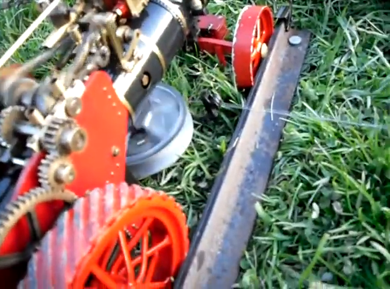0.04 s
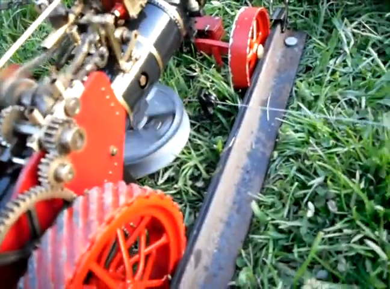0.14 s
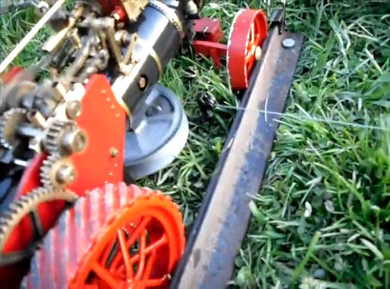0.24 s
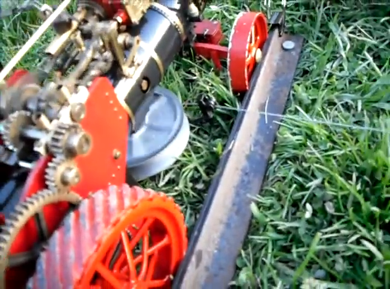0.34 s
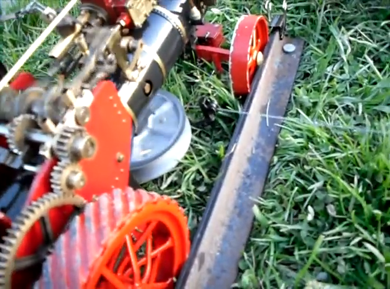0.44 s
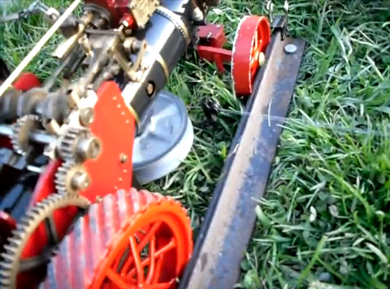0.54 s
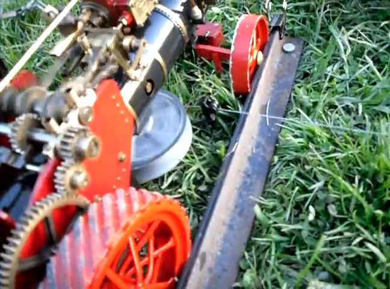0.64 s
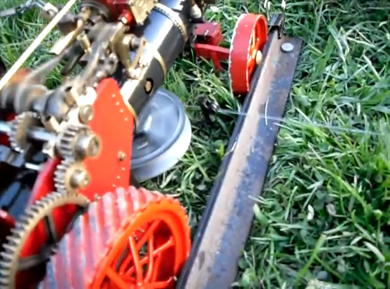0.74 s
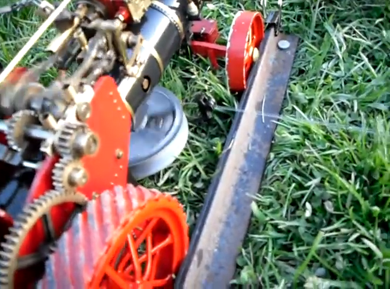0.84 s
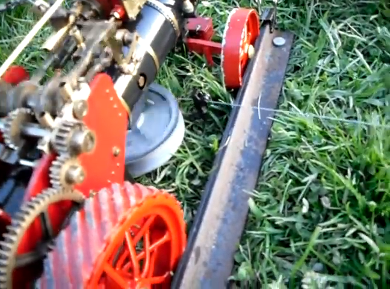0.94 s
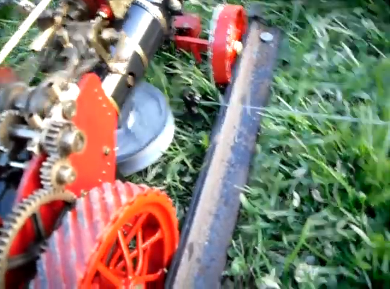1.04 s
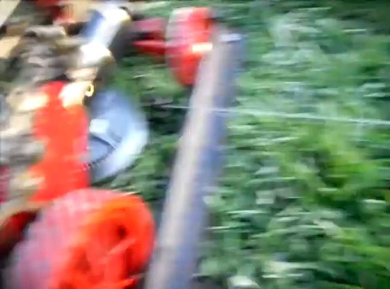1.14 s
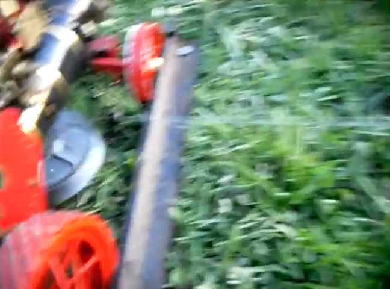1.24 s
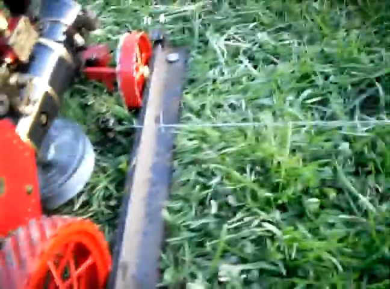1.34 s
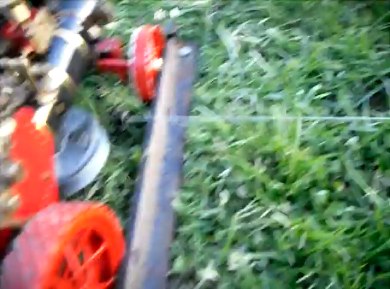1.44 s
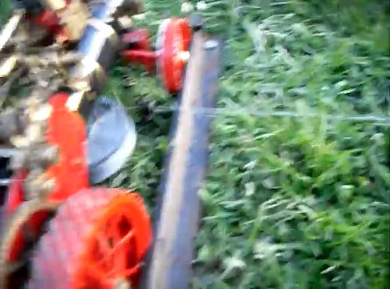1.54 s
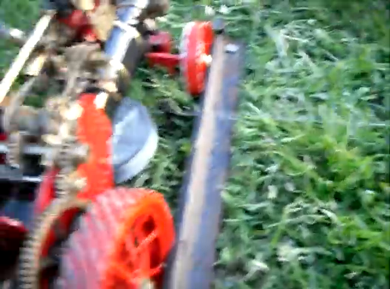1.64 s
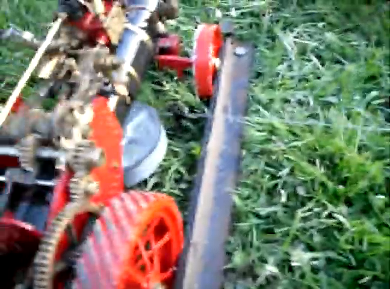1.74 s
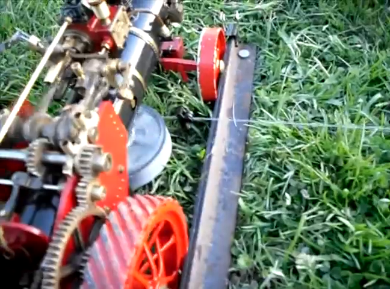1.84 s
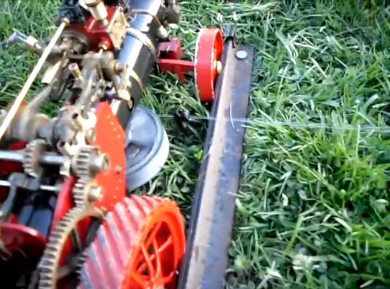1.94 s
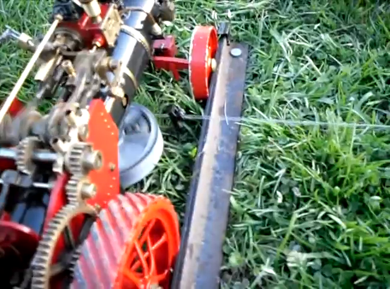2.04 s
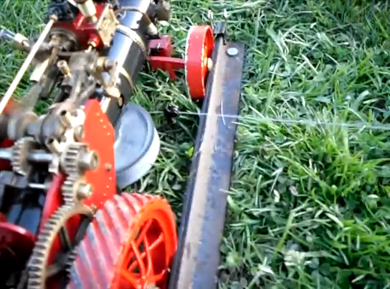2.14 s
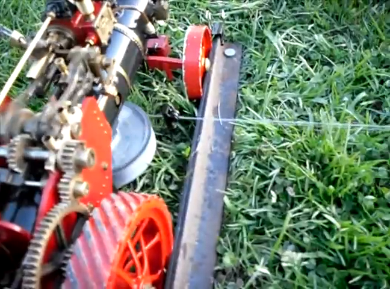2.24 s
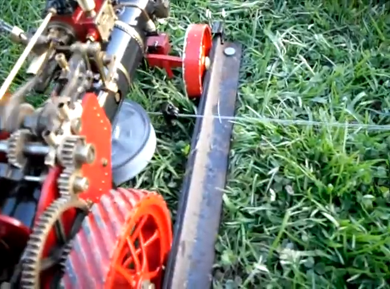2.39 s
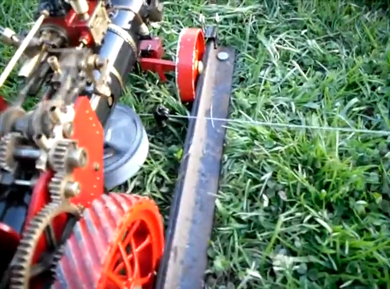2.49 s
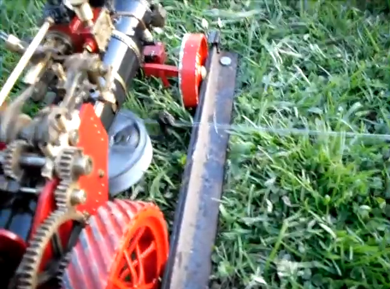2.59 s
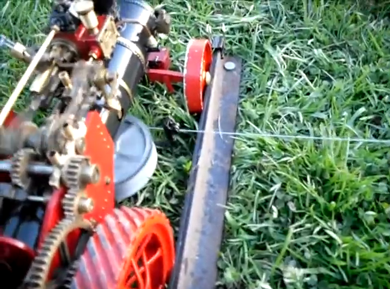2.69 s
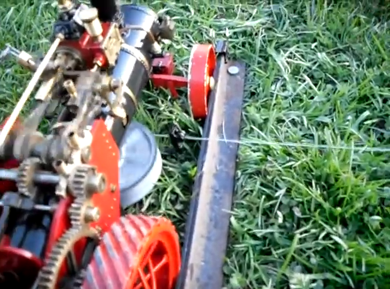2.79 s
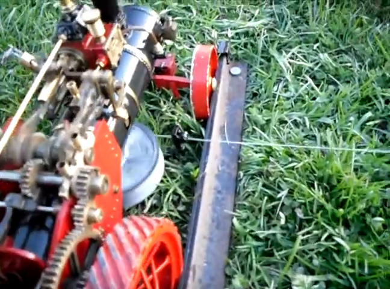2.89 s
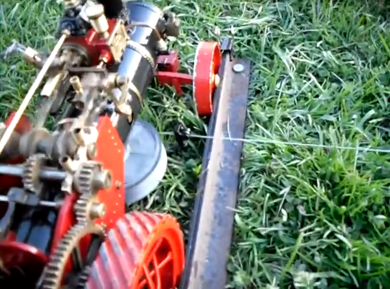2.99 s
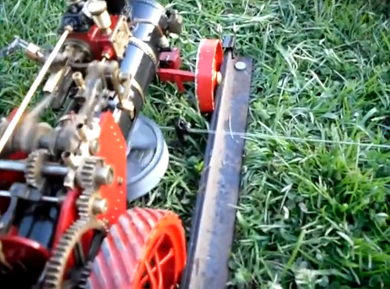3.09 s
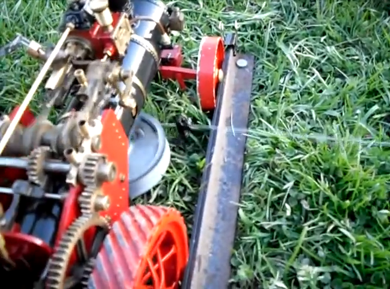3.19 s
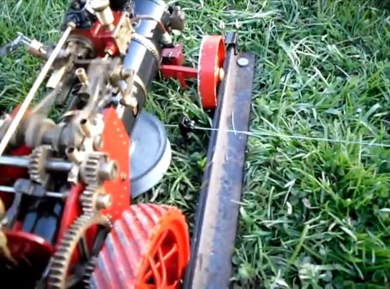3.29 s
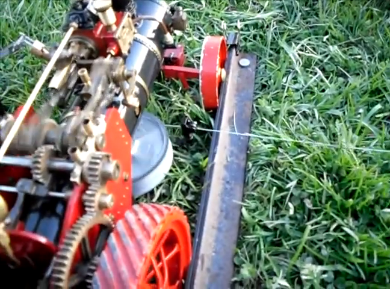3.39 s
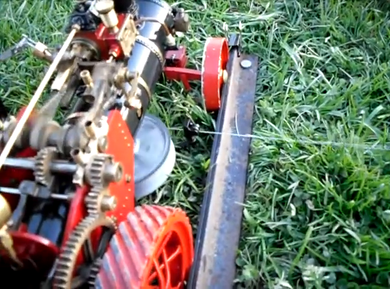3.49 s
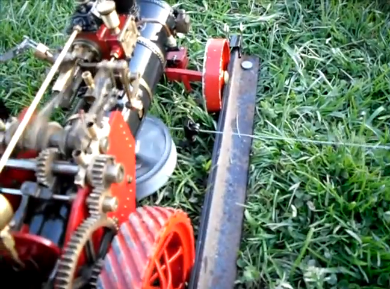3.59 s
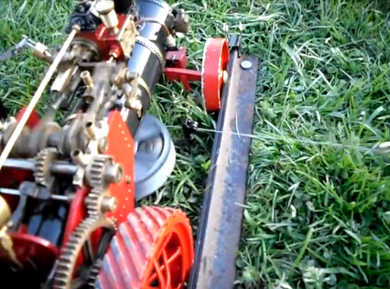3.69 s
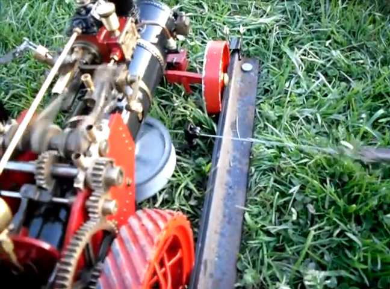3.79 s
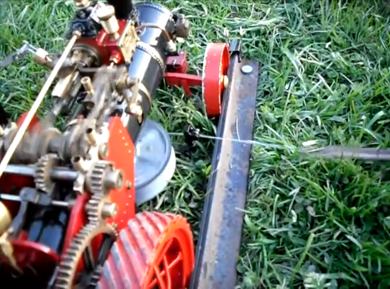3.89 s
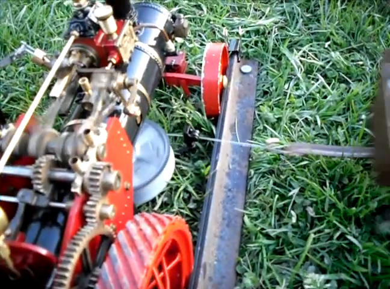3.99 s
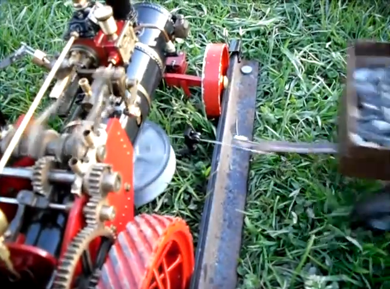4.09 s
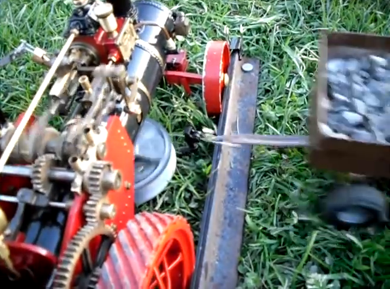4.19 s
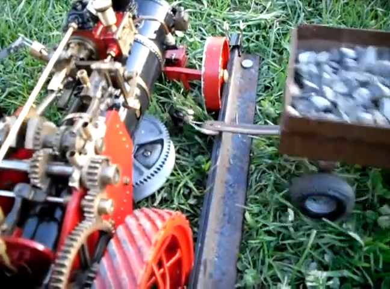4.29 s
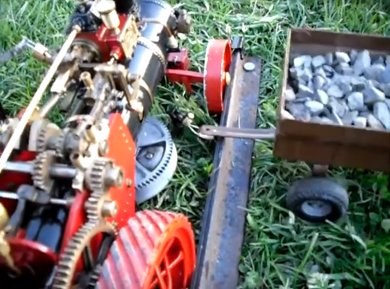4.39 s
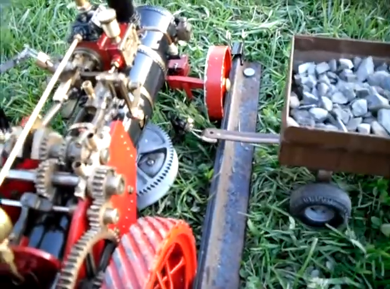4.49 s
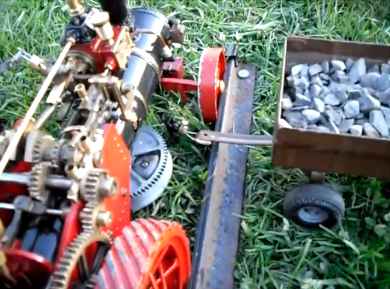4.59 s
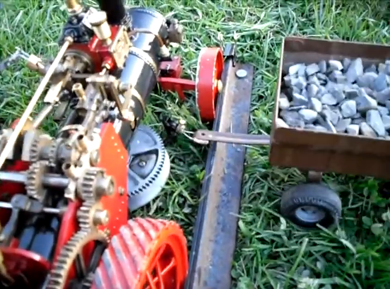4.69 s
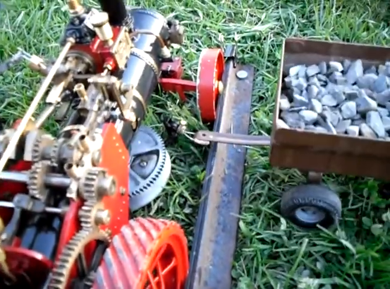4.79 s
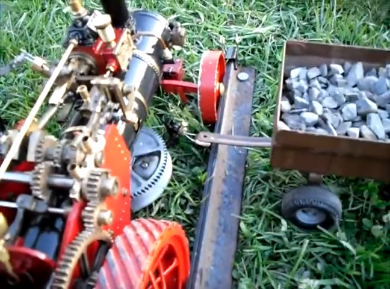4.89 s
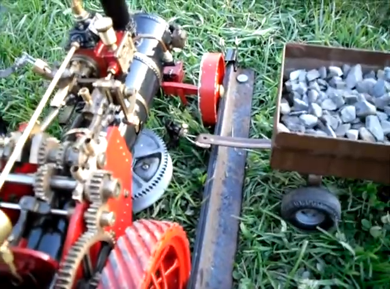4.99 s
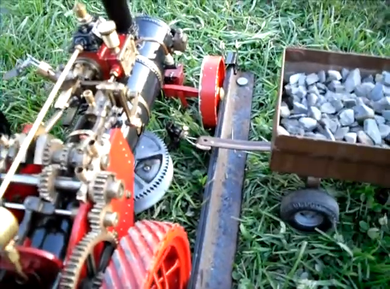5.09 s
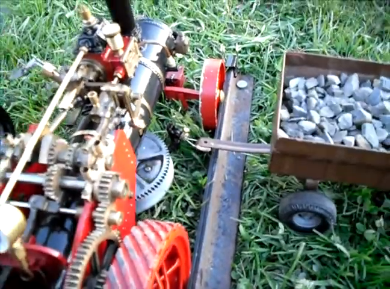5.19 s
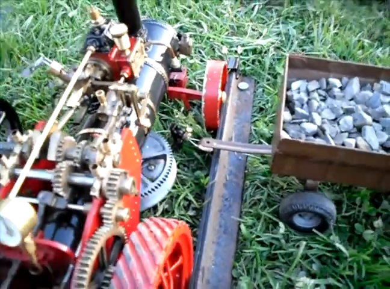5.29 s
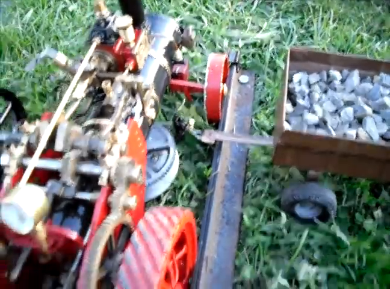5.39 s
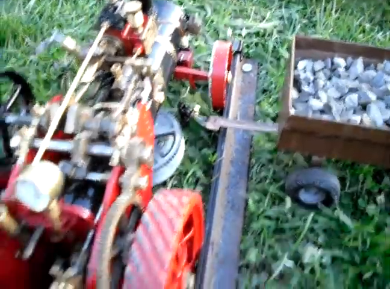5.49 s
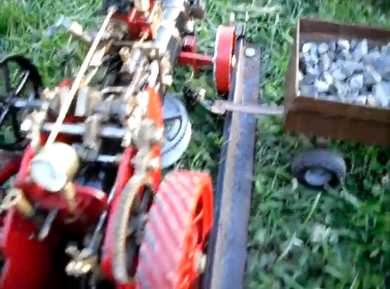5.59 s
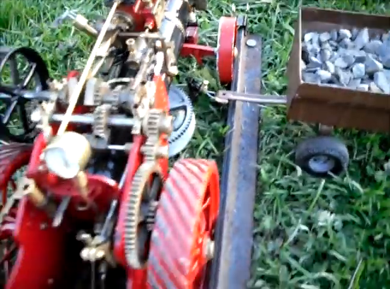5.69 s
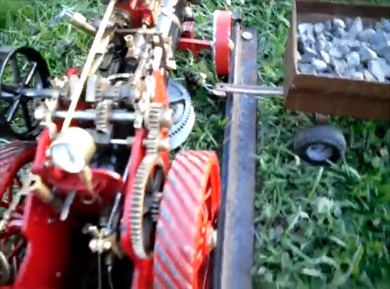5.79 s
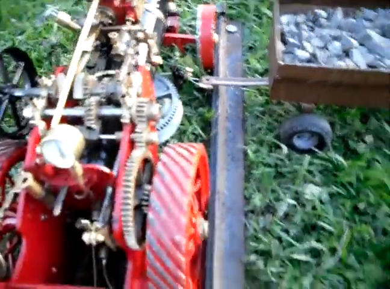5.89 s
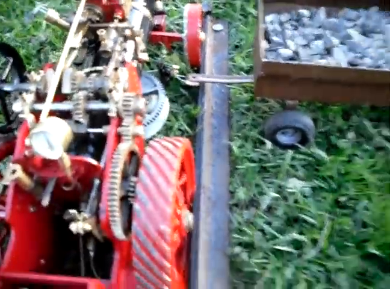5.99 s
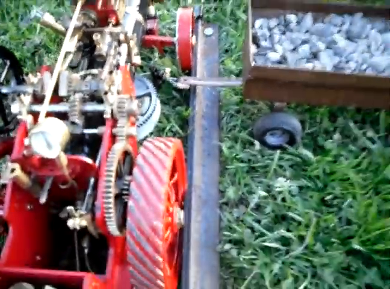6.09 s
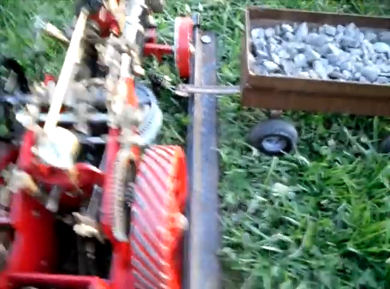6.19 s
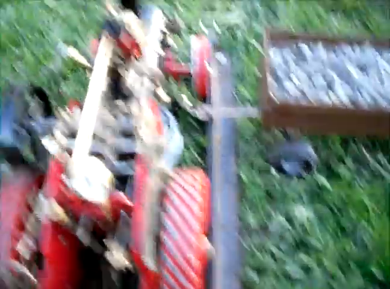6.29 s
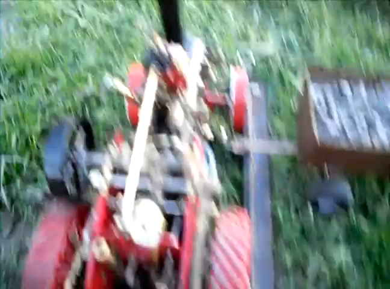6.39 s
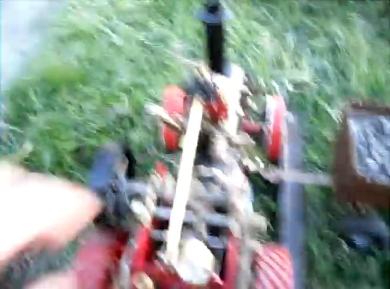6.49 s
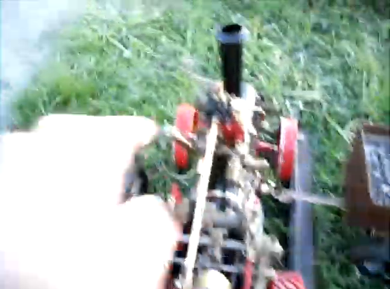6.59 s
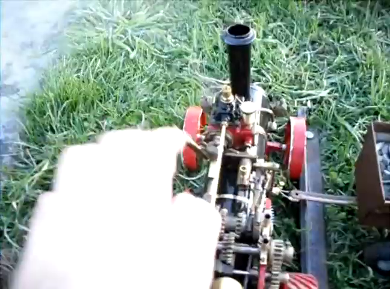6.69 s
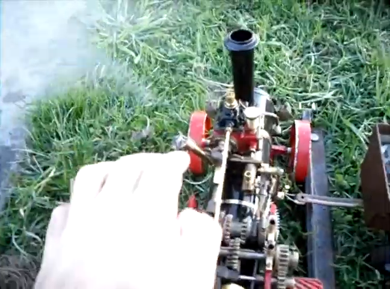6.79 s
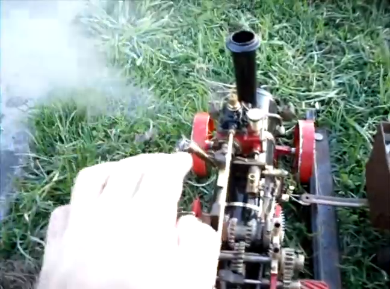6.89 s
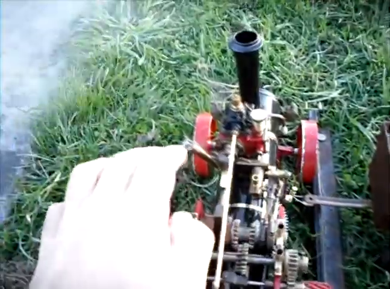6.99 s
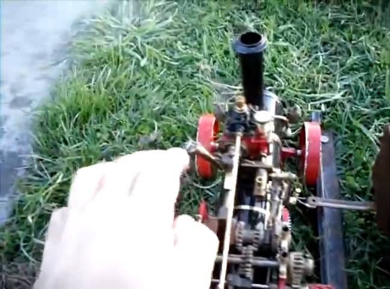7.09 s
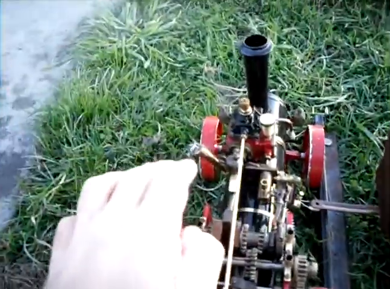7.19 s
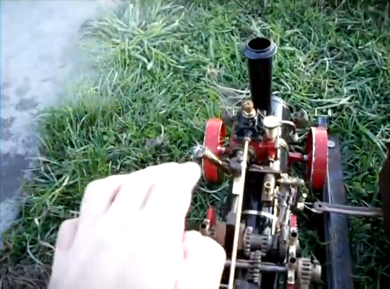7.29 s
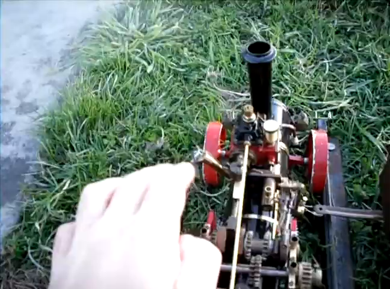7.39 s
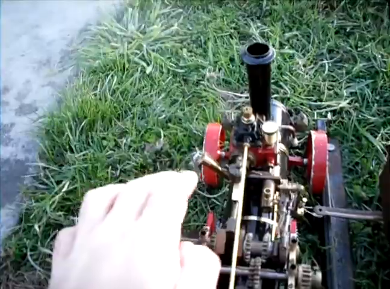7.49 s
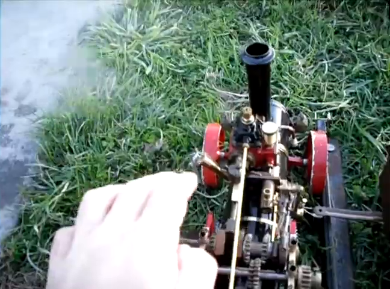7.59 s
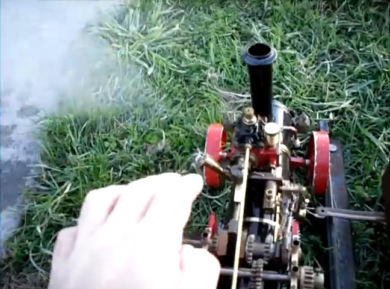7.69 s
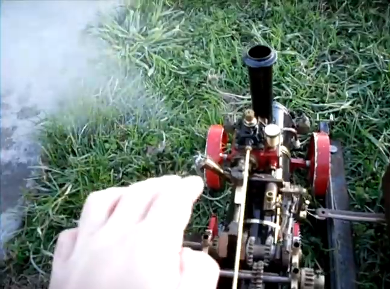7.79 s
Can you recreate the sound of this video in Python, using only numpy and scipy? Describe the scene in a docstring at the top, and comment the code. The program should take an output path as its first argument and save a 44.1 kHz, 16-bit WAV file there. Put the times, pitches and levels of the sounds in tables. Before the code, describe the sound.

A small model steam engine chuffs and clatters rapidly, stops and hisses faintly, then gives three shrill, breathy whistle blasts.

```python
"""Model traction engine on a lawn

A model steam traction engine runs in the open air, close to the microphone of a small hand-held camera.
Each turn of the crank gives a puff up the chimney and two bursts of clatter; then it stops and simmers,
ticking. Its whistle is pulled three times, breathy at first, then shrill enough to overload the camera."""
import sys
import numpy as np
from scipy import signal
from scipy.fft import irfft
from scipy.io import wavfile

SR = 44100
rng = np.random.default_rng(int(sys.argv[2]) if len(sys.argv) > 2 else 0)


def inscribe(sig):
    """Save sig as 16-bit PCM at rate SR to the path in sys.argv[1].

    A 1-D sig is mono; a 2-D sig holds one channel per row.
    Samples are clipped to [-1, 1] before scaling.
    """
    pcm = np.round(np.clip(np.atleast_2d(sig).T, -1, 1) * 32767)
    wavfile.write(sys.argv[1], SR, pcm.astype(np.int16))


N = 346185
TIME = np.arange(N) / SR

# The boiler's simmer over the garden air. Each row: frequency in Hz, relative level in dB.
SIMMER_COLOUR = [(20, -0.5), (100, 0.5), (170, 3), (260, -1), (500, -5), (660, -10), (900, -12.5),
                 (1400, -14), (3100, -17), (3600, -10), (3800, -10), (4300, -10.5), (4800, -9.5),
                 (5300, -10.5)]
# Faint whines of steam in the passages. Each row: frequency in Hz, width in Hz, level before the fade
# in dB, share of the fade from 0 to 1.
WHINES = [(647, 110, -58, 0.97), (2000, 80, -66.5, 0.97), (3530, 110, -66.5, 0.02)]
# The whines ebb once the engine stands. Each row: time in seconds, gain in dB.
WHINE_FADE = [(0, 1.5), (4.2, -1.5), (4.7, 0.5), (5.3, -11.5), (7.85, -6.5)]
# Handling at the microphone. Each row: start in seconds, length in seconds, frequency in Hz, level in dB.
BUMPS = [(.34, 0.14, 156.3, -44), (2.08, 0.11, 149.5, -49.5), (5.443, 0.078, 59, -47.5),
         (5.684, 0.13, 129.4, -49.5), (5.94, 0.11, 48.6, -46), (6.015, 0.16, 64.5, -54),
         (7.254, 0.031, 108, -39), (7.276, 0.062, 108, -40)]
# Ticks of hot metal and spitting water. Each row: start in seconds, relative peak in dB.
TICKS = [(4.078, -26), (4.124, -27.5), (4.1659, -29.5), (4.4698, -30), (4.9267, -34), (5.0515, -39.5),
         (5.4167, -25), (5.813, -34), (5.951, -29.5), (6.3846, -37)]
# The spectrum of a tick. Each row: frequency in Hz, relative level in dB.
TICK_COLOUR = [(200, -8.5), (700, -13.5), (1100, -16), (2500, -16), (3300, -9), (4300, 0.5), (4700, -7),
               (5500, -16.5)]
# The drawbar and wagon coming to rest. Each row: start in seconds, peak in dB.
RATTLES = [(4.580, -32), (4.591, -30.5), (4.617, -28), (4.632, -29), (4.645, -34), (4.765, -47),
           (5.813, -35), (6.112, -39)]
# The drawbar's resonances. Each row: frequency in Hz, width in Hz, relative level in dB.
DRAWBAR_MODES = [(640, 72, 1.5), (1610, 190, -4.5), (2570, 130, 2), (3750, 64, 2.5), (4300, 960, -9.5)]
# Knocks through the chassis. Each row: start in seconds, peak in dB.
KNOCKS = [(.9870, -2.0), (1.0174, -15)]
# The chassis's resonances. Each row: frequency in Hz, width in Hz, relative level in dB.
CHASSIS_MODES = [(653, 54, 6.5), (1390, 330, -11), (1660, 350, -10), (2554, 184, 0), (4320, 240, -5),
                 (5070, 150, -24)]
# The crank, about 11 turns a second at first, then 14. Each row: time in seconds, turns done.
CRANK_TURNS = [(.02, 0), (.11, 1), (.208, 2), (.556, 6), (.797, 9), (1.105, 13), (1.315, 16), (1.979, 25),
               (3.385, 45), (3.607, 48), (3.884, 52), (4.043, 54), (4.142, 55)]
# How hard the engine works. Each row: time in seconds, relative level in dB.
EFFORT = [(0, -37), (.8, -37.5), (1.1, -36.5), (1.6, -37.5), (2.2, -37), (3.0, -37.5), (3.85, -37.5),
          (4.05, -38.5), (4.14, -46), (4.2, -45.5), (4.35, -57)]
# Slack taken up in rods and valve gear. Each row: share of a turn, relative level in dB,
# decay in seconds, stroke (0 outward, 1 return).
CLACKS = [(.338, -17, 0.0012, 0), (.388, -2.5, 0.003, 0), (.419, 3, 0.0028, 0), (.478, -2, 0.00064, 0),
          (.581, 2, 0.0029, 1), (.621, -3, 0.0043, 1), (.657, -5, 0.0064, 1), (.912, -9, 0.0057, 1)]
# Resonances of the motion work. Each row: frequency in Hz, width in Hz, then relative levels in dB
# for the outward stroke, the return stroke and sliding.
FRAME_MODES = [(699, 162, -2.5, -2, 2.5), (1615, 164, -15, 1, -1.5), (1735, 66, -2.5, 6.5, -20.5),
               (2085, 73, -5.5, -20.5, 3.5), (2426, 280, 0.5, 0.5, 0), (2850, 760, -27, -4, -6),
               (3613, 100, 3.5, -3, -20.5), (4090, 380, 2, 5.5, 2), (4800, 940, -2, 1, -20.5),
               (5080, 550, -4.5, 2.5, -4.5)]
# Friction and steam flow, with a lull just before the puff. Each row: share of a turn, gain in dB.
SLIDING = [(0, -1), (.1, 2.5), (.33, 2.5), (.55, -2.5), (.8, -3), (.94, 1.5), (.98, -0.5), (1, -3)]
# Drops of water spat through the whistle. Each row: start in seconds, peak in dB.
SPITS = [(6.719, -10), (7.534, 2.5), (7.719, 3)]
# The spectrum of a spit. Each row: frequency in Hz, relative level in dB.
SPIT_COLOUR = [(100, -9), (1500, -9.5), (3400, -5.5), (4300, -0.5), (5300, 3.5)]
# The whistle's steam jet. Each row: frequency in Hz, relative level in dB.
JET_COLOUR = [(30, -20), (200, -17), (500, -18.5), (2000, -17.5), (2600, -15.5), (3050, -6), (3450, -5),
              (3800, -5.5), (4600, 1.5), (5150, -7.5), (5500, -5)]
# Broad hiss that swells and fades with the whistle's tone. Each row: frequency in Hz, relative level in dB.
TONE_HISS_COLOUR = [(30, 6), (200, 3), (1000, 3.5), (2500, 3), (3800, -8.5), (4800, -14.5), (5080, 4.5),
                    (5300, 13.5), (5500, -5)]
# Pulls on the whistle valve. Each row: start, time taken to open and moment of shutting, all in seconds,
# then tone gain and jet gain in dB.
PULLS = [(6.637, 0.014, 6.759, -1.5, 1.5), (7.014, 0.019, 7.178, -2, 0), (7.306, 0.023, 7.86, 1.5, 0.5)]
# Pitch rising and sagging with steam pressure, one curve a pull. Each row: time in seconds, pitch in Hz.
PRESSURE_PITCH = [
    [(6.644, 4277), (6.650, 4635), (6.694, 4724), (6.701, 4554), (6.734, 4614), (6.741, 4477),
     (6.764, 4145), (6.785, 4155)],
    [(7.017, 3710), (7.095, 3780), (7.124, 4047), (7.137, 4183), (7.164, 4144), (7.18, 4000)],
    [(7.313, 3706), (7.445, 3764), (7.499, 4150), (7.505, 4550), (7.553, 4658), (7.593, 4564),
     (7.705, 4556), (7.711, 4440), (7.77, 4390), (7.812, 4373), (7.832, 4305), (7.85, 4053)],
]
# How the pipe speaks as pressure rises: breath, then one pure tone, then overblown and ragged.
# Each row: pitch in Hz, tone gain in dB, purity from 0 to 1, jet gain in dB.
VOICING = [(3790, -36, .02, -31.5), (4060, -21, 0.1, -25), (4183, -10, .96, -24.5), (4356, -2, 0.95, -26),
           (4470, -4.5, 0.94, -18), (4573, -9, 0.6, -20.5), (4575, -14, 0, -27)]


def amp(db):
    """Decibels to gain."""
    return 10 ** (np.asarray(db) / 20)


def unit(x):
    """Scales to rms 1."""
    return x / np.sqrt(np.mean(x ** 2) + 1e-20)


def add(mix, start_s, sound):
    """Mixes a sound in at its start time."""
    part = mix[max(round(start_s * SR), 0):][:len(sound)]
    part += sound[:len(part)]


def causal(gain):
    """Minimum-phase impulse response of energy 1 for a gain over the full circle of frequencies."""
    log_gain = np.log(np.maximum(gain / gain.max(), 1e-5))
    spectrum = np.exp(np.conj(signal.hilbert(log_gain)))
    ring = np.fft.ifft(spectrum).real[:len(gain) // 2]
    return ring / np.linalg.norm(ring)


def colour(points, size=8192):
    """Impulse response of a spectrum (Hz, dB), cut steeply above 6.3 kHz."""
    hz = abs(np.fft.fftfreq(size, 1 / SR)) + 1
    point_hz, point_db = np.transpose(points)
    gain = amp(np.interp(np.log(hz), np.log(point_hz), point_db))
    return causal(gain / (1 + (hz / 6300) ** 20))


def body(modes, size=4096):
    """Impulse response of a set of resonances (Hz, width in Hz, dB)."""
    hz = abs(np.fft.fftfreq(size, 1 / SR))
    power = sum(amp(db) ** 2 / (1 + (2 * (hz - centre) / width) ** 2) for centre, width, db in modes)
    return causal(np.sqrt(power))


def through(x, ring):
    """Passes a signal through an impulse response."""
    return signal.oaconvolve(x, ring)[:len(x)]


def noise(points, size=N):
    """Steady noise with a given spectrum (Hz, dB)."""
    return through(rng.standard_normal(size), colour(points))


def wander(width_hz, size, order=2):
    """Complex noise of power 1 and a given bandwidth: the envelope of a randomly driven resonance."""
    white = rng.standard_normal((size, 2)) @ [1, 1j]
    rolloff = 1 + abs(np.fft.fftfreq(size, 1 / SR) * 2 / width_hz) ** order
    envelope = np.fft.ifft(np.fft.fft(white) / rolloff)
    return envelope / np.sqrt(np.mean(abs(envelope) ** 2))


def strike(rows, ring, decay_s, scrape, spread_s):
    """Blows, each a contact and a brief scrape, ringing a body whose high modes answer a little later."""
    out, t = np.zeros(N), np.arange(SR // 50) / SR
    hz = np.fft.rfftfreq(len(t), 1 / SR)
    dispersion = np.exp(-1j * np.pi * spread_s * hz ** 2 / (SR / 8))
    contact = irfft(dispersion, len(t)) * (1 - t / t[-1])
    for start, db in rows:
        grit = scrape * rng.standard_normal(len(t)) * np.exp(-t / decay_s)
        blow = signal.fftconvolve(contact + grit, ring)
        add(out, start, amp(db) * blow / abs(blow).max())
    return out


def garden(x, echo_s=.068, echo_db=-40, echo_decay_s=.012, scatter_db=-39, scatter_decay_s=.035):
    """Open air, close up: the direct sound, a little scatter and one weak, smeared echo."""
    t = np.arange(SR // 4) / SR
    tail = rng.standard_normal(len(t)) * np.exp(-t / scatter_decay_s)
    echo = rng.standard_normal(len(t)) * np.exp(-t / echo_decay_s)
    tail *= amp(scatter_db) / np.linalg.norm(tail)
    add(tail, echo_s, amp(echo_db) * echo / np.linalg.norm(echo))
    return x + through(x, tail)


def simmer(hiss_db=-51.5, flutter_db=1, blowdown_db=-60):
    """Steam leaks with a fluttering hiss; whines and the cylinder's blowdown ebb once the engine stands."""
    hiss = noise(SIMMER_COLOUR) * amp(flutter_db * unit(wander(40, N).real))
    fade_db = np.interp(TIME, *np.transpose(WHINE_FADE))
    whines = np.zeros(N)
    for hz, width, db, share in WHINES:
        band = (wander(width, N) * np.exp(2j * np.pi * hz * TIME)).real
        whines += amp(db + share * fade_db) * unit(band)
    blowdown = noise([(100, -2.5), (600, 6), (1100, -1), (2300, -6), (3200, -10.5), (5400, -13)])
    return amp(hiss_db) * hiss + whines + amp(blowdown_db + fade_db) * blowdown


def handling():
    """The hand on the camera makes soft low bumps, right at the microphone."""
    out = np.zeros(N)
    for start, length, hz, db in BUMPS:
        t = np.arange(int(length * SR)) / SR
        thud = (wander(50, SR)[:len(t)] * np.exp(2j * np.pi * hz * t)).real
        add(out, start, amp(db) * unit(thud) * np.hanning(len(t)))
    return out


def boiler_ticks(gain_db=5):
    """Hot metal and spitting water tick sharply as the engine stops and stands."""
    return amp(gain_db) * strike(TICKS, colour(TICK_COLOUR), decay_s=.0011, scrape=.2, spread_s=.00039)


def drawbar_rattles():
    """The wagon comes to rest, and gritty blows ring the drawbar."""
    return strike(RATTLES, body(DRAWBAR_MODES), decay_s=.0027, scrape=.89, spread_s=.00091)


def chassis_knocks():
    """A hard knock and a softer one ring through the chassis."""
    return strike(KNOCKS, body(CHASSIS_MODES), decay_s=.005, scrape=.025, spread_s=.0017)


def turn_starts():
    """The moments at which the crank begins each turn."""
    times, turns = np.transpose(CRANK_TURNS)
    return np.interp(np.arange(turns[-1] + 1), turns, times)


def clack(decay_s, snap=4, size=SR // 50):
    """A sharp contact and a brief gritty chatter; its energy grows with its length."""
    burst = rng.standard_normal(size) * np.exp(-np.arange(size) / SR / decay_s)
    burst[0] += snap
    return burst / np.linalg.norm(burst) * np.sqrt(decay_s * SR / 2)


def motion_work(clack_db=8, slide_db=-3, grain_db=3, rumble_db=-17):
    """Rods clack on both strokes; gears and guides slide and chatter over a low rumble."""
    starts, modes = turn_starts(), np.array(FRAME_MODES)
    outward_ring, return_ring, slide_ring = (body(modes[:, [0, 1, level]]) for level in (2, 3, 4))
    blows = np.zeros((2, N))
    for start, period in zip(starts, np.diff(starts)):
        for share, db, decay_s, stroke in CLACKS:
            late, force_db = rng.standard_normal(2) * [.004, 1]
            add(blows[round(stroke)], start + period * (share + late), amp(db + force_db) * clack(decay_s))
    clatter = through(blows[0], outward_ring) + through(blows[1], return_ring)
    turn_share = np.interp(TIME, starts, np.arange(len(starts))) % 1
    teeth = amp(grain_db * unit(wander(440, N).real))
    rub = unit(teeth * rng.standard_normal(N)) * amp(np.interp(turn_share, *np.transpose(SLIDING)))
    slide = through(rub, slide_ring)
    rumble = noise([(25, -12), (90, -2), (170, -1), (350, -9.5), (900, -14.5), (3000, -36)])
    effort = amp(np.interp(TIME, *np.transpose(EFFORT)))
    return effort * (amp(clack_db) * clatter + amp(slide_db) * slide + amp(rumble_db) * rumble)


def exhaust(pipe_hz=655, hold_s=.0095, ring_hz=690, ring_db=-18, ring_decay_s=.01,
            push_hz=190, push_db=-3, push_decay_s=.0017, gain_db=8.5, uneven_db=.34, cruise_turn_s=.071):
    """Once a turn, steam pushes the chimney's air, which rings briefly; effort and speed puff harder."""
    out, t = np.zeros(N), np.arange(SR // 14) / SR
    opening = np.minimum(t / .0005, 1)
    push = -np.cos(2 * np.pi * push_hz * t) * np.exp(-t / push_decay_s) * amp(push_db)
    starts = turn_starts()
    speeds = cruise_turn_s / np.gradient(starts)
    strengths = amp(gain_db + np.interp(starts, *np.transpose(EFFORT))) * speeds
    for start, strength in zip(starts, strengths):
        detune, drift, weakness = rng.standard_normal(3)
        swing = np.cos(2 * np.pi * pipe_hz * (1 + .007 * detune) * t) * np.exp(-(t / hold_s) ** 2)
        ring = np.cos(2 * np.pi * (ring_hz + 20 * drift) * t) * np.exp(-t / ring_decay_s) * amp(ring_db)
        add(out, start, strength * amp(-uneven_db * weakness) * (swing + ring + push) * opening)
    return out


def water_spits():
    """Drops of water crack through the whistle, close to the microphone."""
    return strike(SPITS, colour(SPIT_COLOUR), decay_s=.0025, scrape=.23, spread_s=.000506)


def whistle(pull, pitch, breath_width_hz=480, tone_hiss_db=-17, waver_hz=18, sputter_hz=30,
            lag_s=.0038, build_s=.0011, shut_db_per_s=849.5):
    """Pressure sets pitch and voice: breathy, then pure, then overblown; wet steam makes it sputter."""
    opens, opening_s, shuts, pull_tone_db, pull_jet_db = pull
    t = np.arange(opens, shuts + .06, 1 / SR)
    opening = np.minimum((t - opens) / opening_s, 1) ** 2
    valve = opening * amp(-shut_db_per_s * np.maximum(t - shuts, 0))
    hz = np.interp(t, *np.transpose(pitch))
    # the pipe's voice follows the pressure a moment late
    drive_hz = np.interp(t - lag_s, t, hz) + sputter_hz * wander(120, SR)[:len(t)].real
    voicing_hz, *columns = np.transpose(sorted(VOICING))
    tone_db, purity, jet_db = (np.interp(drive_hz, voicing_hz, column) for column in columns)
    retained = np.exp(-1 / (build_s * SR))
    sounding = signal.lfilter([1 - retained], [1, -retained], amp(tone_db + pull_tone_db))
    wavering_hz = hz + waver_hz * wander(190, SR)[:len(t)].real
    carrier = np.exp(2j * np.pi * np.cumsum(wavering_hz) / SR)
    breath = wander(breath_width_hz, SR, order=4)[:len(t)]
    swing = np.sqrt(purity) + np.sqrt(1 - purity) * breath
    tone = np.sqrt(2) * (swing * carrier).real
    jet = noise(JET_COLOUR, SR)[:len(t)]
    tone_hiss = amp(tone_hiss_db) * noise(TONE_HISS_COLOUR, SR)[:len(t)]
    return valve * (sounding * (tone + tone_hiss) + amp(jet_db + pull_jet_db) * jet)


def scene():
    """The engine and its whistle on the lawn, at one close, hand-held microphone."""
    blasts = water_spits()
    for pull, pitch in zip(PULLS, PRESSURE_PITCH):
        add(blasts, start_s=pull[0], sound=whistle(pull, pitch))
    engine = chassis_knocks() + drawbar_rattles() + boiler_ticks() + exhaust() + motion_work()
    return (garden(engine + blasts) + simmer() + handling())[None]


def record(dry, ceiling=.65, output_ceiling=.68, treble_edge_hz=15800):
    """The camera samples at a quarter rate and overloads, folding overtones down."""
    narrow = signal.firwin(131, SR / 8, window=("kaiser", 9), fs=SR)
    quarter_rate = signal.resample_poly(dry[0], 1, 4, window=narrow)
    overloaded = np.clip(quarter_rate, -ceiling, ceiling)
    full_rate = signal.resample_poly(overloaded, 4, 1, window=narrow)[:N]
    flattened = np.clip(full_rate, -output_ceiling, output_ceiling)  # peaks between samples overload again
    lowpass = signal.firwin(511, treble_edge_hz, window=("kaiser", 9), fs=SR)
    return signal.oaconvolve(flattened, lowpass, "same")[None]


dry = scene()
out = record(dry)
inscribe(out)
```